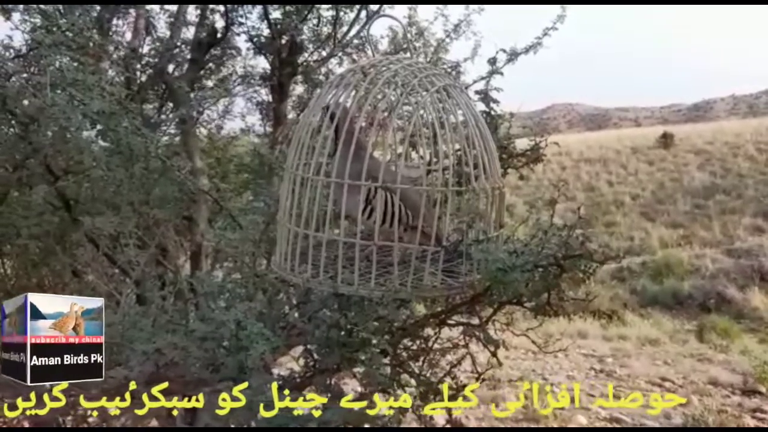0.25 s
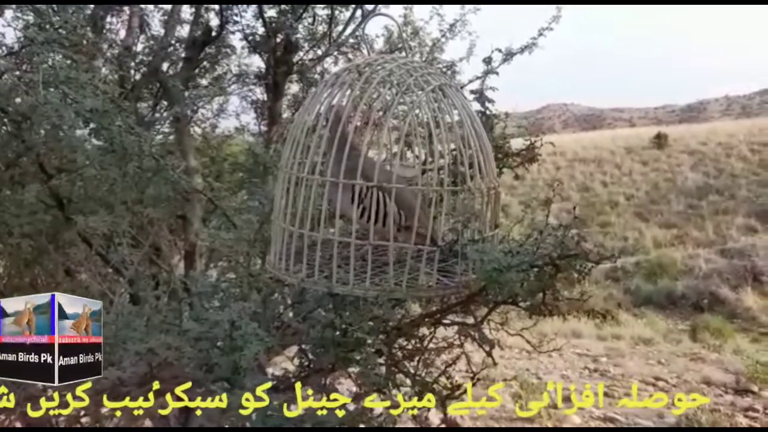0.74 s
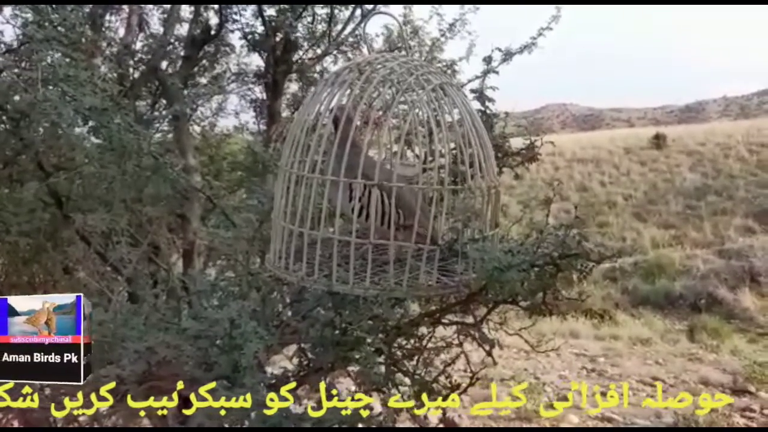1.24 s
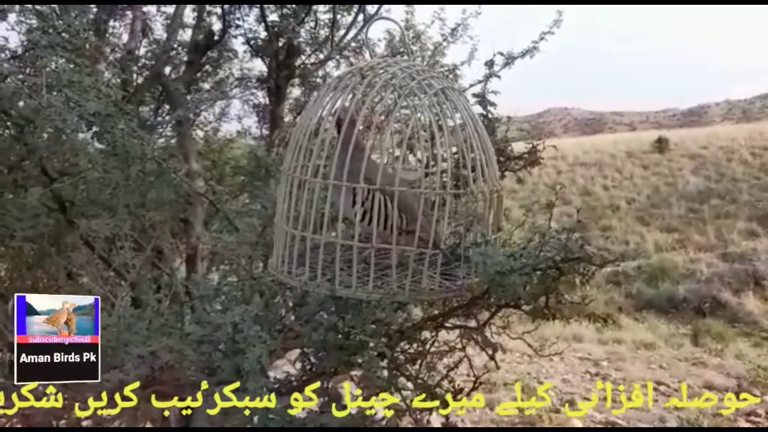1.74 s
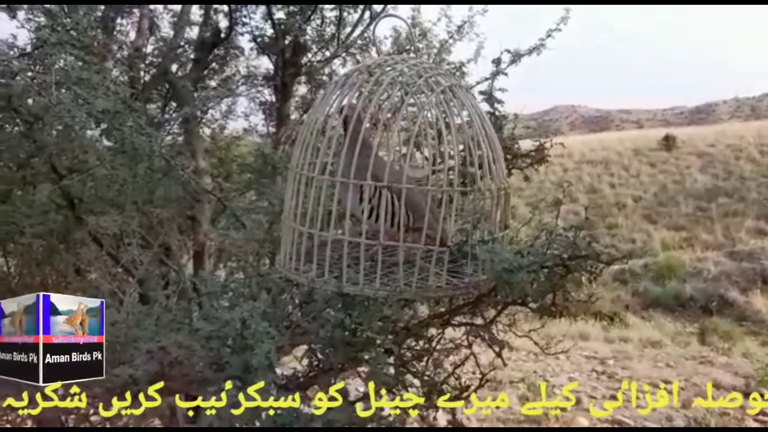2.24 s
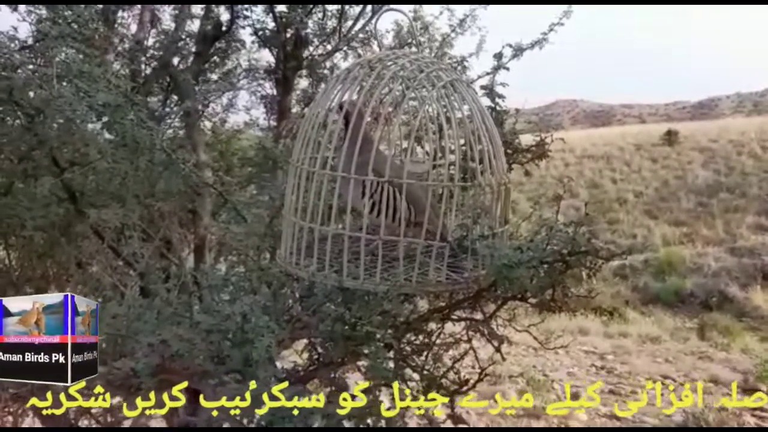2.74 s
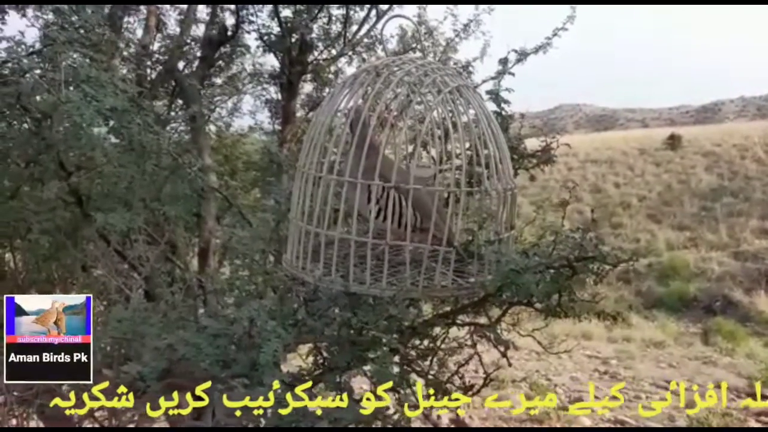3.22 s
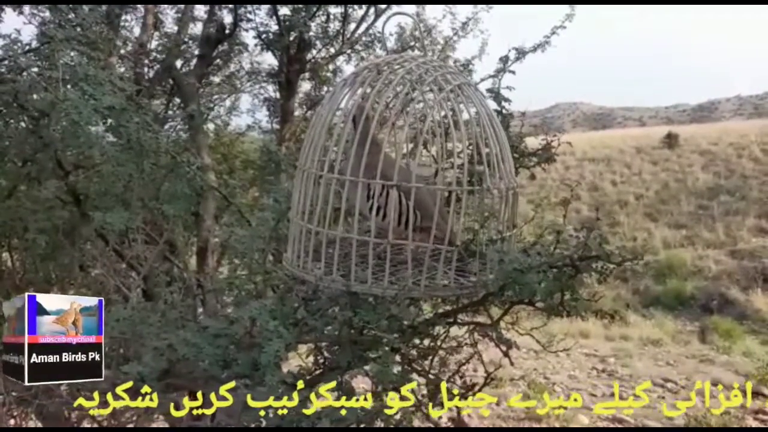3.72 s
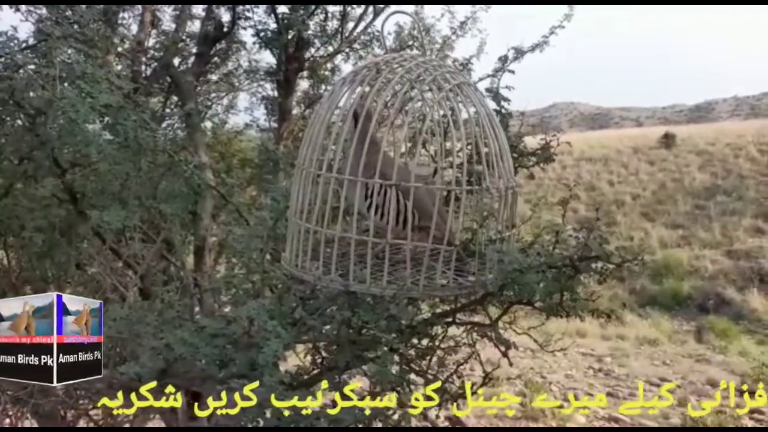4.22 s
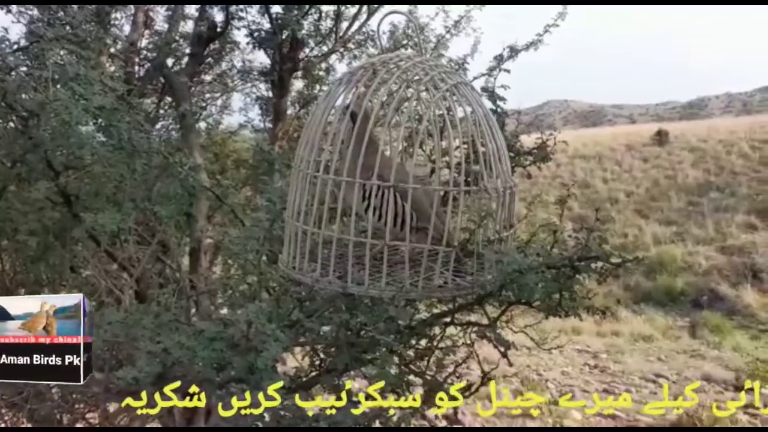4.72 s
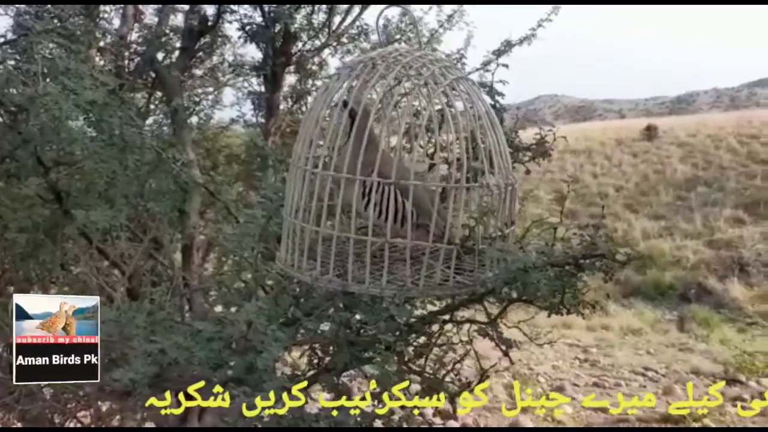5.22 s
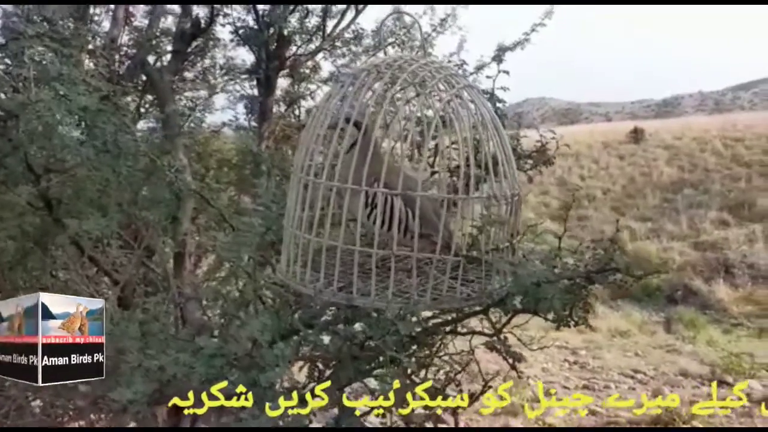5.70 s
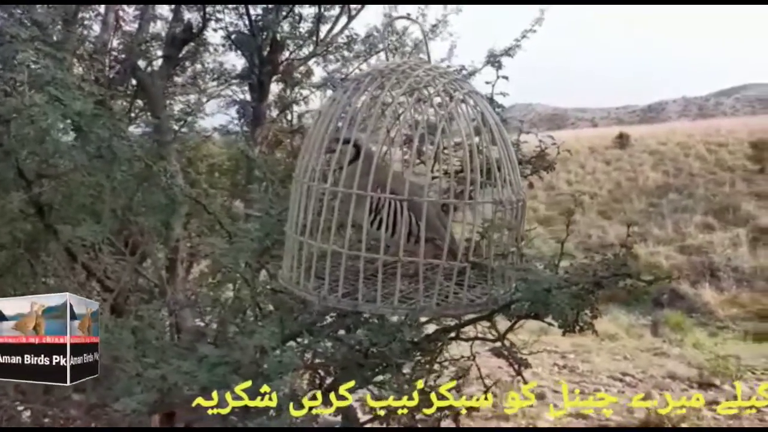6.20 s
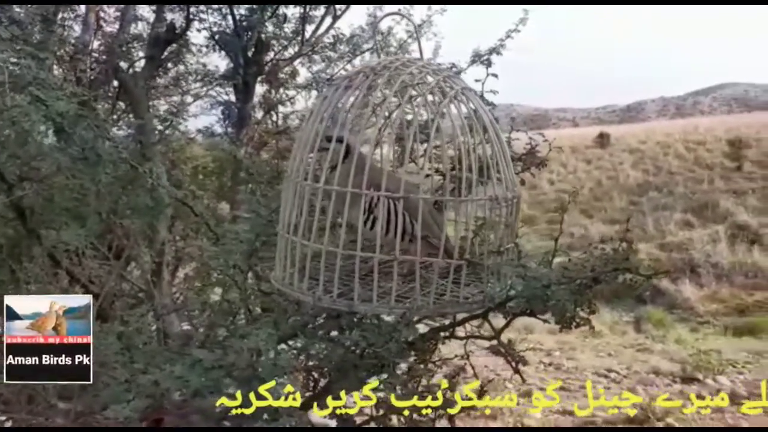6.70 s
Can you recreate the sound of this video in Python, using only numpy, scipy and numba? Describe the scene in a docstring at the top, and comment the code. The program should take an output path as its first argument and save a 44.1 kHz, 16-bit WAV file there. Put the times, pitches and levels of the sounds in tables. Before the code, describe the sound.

On a quiet open hillside, a caged partridge calls loudly and close, almost entirely on the right. Short hoarse barks, several per second, settle into a steady 'chuk, ka-kar' phrase that climbs in pitch and brightens. Softer husky clucks, perhaps another bird, sit near the centre and gradually weaken. Faint thin whistles come and go, and a slight echo trails off the slope.

```python
"""In quiet air on an open hillside, soft husky clucks, perhaps of a second bird, and hoarse barks start together.
The barks, far to the right, are a caged chukar partridge: membrane pulses ring in a moving throat resonance.
They settle into the phrase 'chuk, ka-kar' and climb in pitch, each with a dull bump and a faint echo off the slope.
Low buffets swell early on, and thin, distant whistles come and go as gliding sine tones.
The clucks weaken; after one tick of the wicker cage, a noise burst, only muffled ones remain under the calls."""
import sys
import numpy as np
from scipy import signal
from scipy.fft import rfft, irfft, next_fast_len
from scipy.io import wavfile
from scipy.ndimage import uniform_filter1d, minimum_filter1d
from numba import njit

SR = 44100
rng = np.random.default_rng(int(sys.argv[2]) if len(sys.argv) > 2 else 0)


def wrap_up_sound(samples):
    """Save the sound to the file named by the first command line argument, as 16-bit audio."""
    columns = np.atleast_2d(samples).T
    # keep every value between -1 and 1, then stretch to whole-number steps
    tamed = np.clip(columns, -1, 1)
    steps = np.round(tamed * 32767).astype(np.int16)
    wavfile.write(sys.argv[1], SR, steps)


N = 306495

# colour of the low bumps and buffets: frequency_hz, gain_db
LOW_TONE = [(20, -16.5), (55, 3), (110, -2), (170, -11), (260, -13.5), (500, -51.5)]
LEAD_S = .008  # short quiet lead-in before each loud note


def from_db(db):
    """Turn decibels into an amplitude factor."""
    return 10 ** (np.asarray(db) / 20)


def rms_one(x):
    """Scale a sound to an RMS level of 1."""
    return x / np.sqrt(np.mean(x ** 2) + 1e-20)


def add(track, start_s, sound):
    """Mix a sound into a track, cut at the track's end."""
    at = max(int(start_s * SR), 0)
    track[..., at:at + sound.shape[-1]] += sound[..., :max(N - at, 0)]


def coloured(x, points):
    """Filter by a curve of (Hz, dB) points joined along log frequency."""
    size = next_fast_len(x.shape[-1] + 512)
    hz, db = np.transpose(points)
    bin_hz = np.arange(size // 2 + 1) * SR / size
    gain = from_db(np.interp(np.log(bin_hz + 1), np.log(hz), db))
    return irfft(rfft(x, size) * gain, size)[..., :x.shape[-1]]


def filtered(x, order, hz, kind="low"):
    """Apply a Butterworth filter."""
    return signal.sosfilt(signal.butter(order, hz, kind, fs=SR, output="sos"), x)


def flutter(size, rate_hz):
    """Random wavering up to a given rate; spread 1."""
    settle = 2000  # samples dropped while the filter settles
    return rms_one(filtered(rng.standard_normal(size + settle), 2, rate_hz)[settle:])


def evened(x, span_s):
    """Hold the short-term level near 1, as a saturating oscillator does."""
    span = int(span_s * SR)
    power = uniform_filter1d(uniform_filter1d(x ** 2, span), span)
    return x / np.sqrt(np.maximum(power, 0) + 1e-9)


def air():
    """Quiet outdoor air: coloured noise, wavering in level, that settles as time goes on, most on the left."""
    # frequency_hz, gain_db
    air_tone = [(25, -15.5), (80, -1), (130, -6), (220, -9.5), (400, -8.5), (850, -7), (1400, -12),
                (2800, -19), (4500, -10.5), (7500, -36.5), (14000, -27.5)]
    # level of the air: time_s, left_db, right_db
    air_level = [(0, -73, -70.5), (2, -76, -72), (5, -88, -72), (6.95, -86.5, -74)]
    both = rng.standard_normal(N) + .8 * rng.standard_normal((2, N))
    times, *sides = np.transpose(air_level)
    level_db = np.array([np.interp(np.arange(N) / SR, times, side) for side in sides])
    return from_db(level_db + 1.2 * flutter(N, 12)) * rms_one(coloured(both, air_tone))


def syrinx(pitch_hz, jitter, rough, noise, jitter_hz, count=14):
    """Membrane pulses, pulled early and late by a slower second oscillation, with air noise in each opening."""
    size = len(pitch_hz)
    wander = jitter * flutter(size, jitter_hz) + .03 * flutter(size, 45)
    second_hz = pitch_hz * (.43 + .14 * flutter(size, 80))
    second = 2 * np.pi * np.cumsum(second_hz) / SR
    pull = .25 * rough * np.sin(second) * (1 + .6 * flutter(size, 50))
    phase = 2 * np.pi * np.cumsum(pitch_hz * (1 + wander)) / SR + pull + rng.uniform(0, 2 * np.pi)
    pulses = rms_one(sum(np.cos(k * phase) for k in range(1, count + 1)))
    strength = 1 + rough * (.3 * flutter(size, 200) + .3 * np.cos(second))
    breath = noise * rng.standard_normal(size) * (1 + np.cos(phase))
    return pulses * strength + breath


def cluck(start, end, level_db, fall_hz):
    """A weak note: clean low harmonics, husky above, rougher when louder; the pitch drops as it stops."""
    # colours of the voice and of the hiss: frequency_hz, gain_db
    cluck_tone = [(200, -35), (380, -14), (560, -10), (800, -8.5), (1130, -3.5), (1280, -0.5), (1700, 5),
                  (2200, -9), (2850, -16), (3350, -26), (4200, -25), (6000, -45.5)]
    cluck_hiss = [(3300, -23), (4100, -7.5), (4700, -6.5), (5300, 4), (5850, -9), (6400, -29),
                  (7200, -46.5), (8100, -35.5), (10000, -43), (13800, -29.5), (15500, -33)]
    usual_pitch_hz, hz_per_db, usual_db = 539, 3, -30  # a louder cluck is higher
    hiss_db, left_db = -15, -0.5  # hiss relative to the voice; left side of the voice relative to the right
    rise_s = .013
    sink_db_per_hz = 0.1168  # a cluck that falls in pitch also loses strength
    length = end - start
    t = np.arange(int((length + 0.0076) * SR)) / SR

    centre_hz = usual_pitch_hz + hz_per_db * (level_db - usual_db)
    glide_hz = centre_hz + fall_hz * np.interp(t, [0, length], [.5, -.5])
    pitch = glide_hz * np.interp(t - length, [-.02, .012], [1, .6])
    chaos = np.interp(level_db, [-38, -29], [.2, 1])
    source = syrinx(pitch, jitter=.06 * chaos, rough=.6 * chaos, noise=.12, jitter_hz=260)
    husk = filtered(rng.standard_normal(len(t)), 2, 1500, "high")
    voice = from_db(level_db) * evened(coloured(source + 1.7 * husk, cluck_tone), span_s=0.026)

    jet = rng.standard_normal((2, len(t))) * from_db(1.5 * flutter(len(t), 400))
    hiss_swell = from_db(np.interp(t / length, [0, .5, 1.2], [-4, 2, -4]))
    hiss = from_db(level_db + hiss_db) * rms_one(coloured(jet, cluck_hiss)) * hiss_swell

    release = from_db(np.interp(t - length, [-.02, 0, .012], [1, -9, -32]))
    shape = np.clip(t / rise_s, 0, 1) * release
    sink = from_db(sink_db_per_hz * fall_hz * (.5 - t / length))
    return (voice * np.array([[from_db(left_db)], [1]]) + hiss) * shape * sink


@njit
def resonate(x, hz, width_hz):
    """One resonance whose centre moves: a two-pole ring fed by the difference of nearby samples."""
    y, r = np.zeros(len(x)), np.exp(-np.pi * width_hz / SR)
    for i in range(2, len(x)):
        drive = (1 - r * r) / 2 * (x[i] - x[i - 2])
        y[i] = drive + 2 * r * np.cos(2 * np.pi * hz[i] / SR) * y[i - 1] - r * r * y[i - 2]
    return y


def chuk(start, end, syllable, level_db, throat_hz):
    """A note starts as a whistle locked to the throat, breaks into a rough bark, and falls as the beak closes."""
    # the hoarse opening note and the syllables of "chuk, ka-kar", by name:
    #   pitch_share (early pitch / throat resonance), pitch_late_hz, throat_mid and throat_late (share of
    #   the early resonance), mid_db and late_db (relative), rise_s, clear_s (clear onset), rough (1 = full bark)
    syllables = {"hoarse": dict(pitch_share=.36, pitch_late_hz=494.4, throat_mid=1, throat_late=.93, mid_db=-0.5, late_db=-1, rise_s=0.014, clear_s=0.013, rough=.8),
                 "chuk": dict(pitch_share=.335, pitch_late_hz=483.4, throat_mid=.915, throat_late=0.78, mid_db=-3, late_db=-4.5, rise_s=0.0057, clear_s=0.013, rough=1),
                 "ka": dict(pitch_share=.42, pitch_late_hz=483, throat_mid=0.97, throat_late=0.88, mid_db=-1.5, late_db=0.5, rise_s=0.011, clear_s=0.0036, rough=.55),
                 "kar": dict(pitch_share=.338, pitch_late_hz=520.5, throat_mid=0.99, throat_late=0.86, mid_db=1, late_db=-1, rise_s=0.0075, clear_s=0.0071, rough=1)}
    # slow change of the treble over the series: time_s, upper_resonance_db, rasp_db (both relative)
    note_colour = [(0, -33, -22.5), (0.702, -28.5, -21), (.93, -15, -34.5), (2, -12, -39.5),
                   (2.9, -14.5, -36.5), (4.7, -18.5, -38.5), (5.3, -23.5, -28), (6.95, -24.5, -21.5)]
    # colours of the bark, the upper resonance, the rasp and the left side: frequency_hz, gain_db
    beak_tone = [(150, -37), (230, -15), (300, 7), (400, -5.5), (600, -8.5), (780, -12), (900, -18.5),
                 (1020, -23.5), (1250, -3), (1800, -2), (2400, -4.5), (2850, -6.5), (3300, -30),
                 (4000, -31.5), (6000, -58)]
    upper_tone = [(3000, -27.5), (3500, -4.5), (3900, -5), (4250, -2), (4520, 4), (4850, -11),
                  (5400, -16.5), (6200, -13), (6700, -8), (7350, -16), (7900, -41.5), (14000, -32)]
    rasp_tone = [(3500, -27), (4600, -3.5), (5150, 9.5), (5650, 0.5), (6100, -15.5), (7000, -43.5),
                 (7800, -42.5), (14000, -44)]
    left_tone = [(200, -5.5), (550, -1), (1100, 9.5), (1400, 1), (1900, -10.5), (2600, 7), (4500, 6.5),
                 (5200, 10), (9000, 10.5)]
    left_db = -43.5  # the loud notes hardly reach the left side
    brighten_db_per_oct, usual_throat_hz = 8.5, 1915  # a higher note is also brighter above its resonance
    core_share = 0.049  # a little of the opening whistle lasts through the bark
    shape = syllables[syllable]
    times, *columns = np.transpose(note_colour)
    upper_db, rasp_db = [np.interp(start, times, column) for column in columns]
    length = end - start
    t = np.arange(int((LEAD_S + length + 0.027) * SR)) / SR - LEAD_S
    u = t / length  # place within the note

    pitch_early, pitch_late = throat_hz * shape["pitch_share"], shape["pitch_late_hz"]
    pitch = np.interp(u, [0, .3, .82, 1.25], [pitch_early * 1.03, pitch_early, pitch_late, pitch_late * .6])
    hz_mid, hz_late = throat_hz * shape["throat_mid"], throat_hz * shape["throat_late"]
    throat_path = [throat_hz * .95, throat_hz, hz_mid, hz_late * 0.91, hz_late * 0.88]
    throat = np.interp(u, [0, .17, .5, .86, 1.1], throat_path)
    throat = throat * (1 + .04 * np.clip(u / .3, 0, 1) * flutter(len(t), 70))

    # the membranes are most chaotic under full pressure and settle as it falls
    chaos = shape["rough"] * np.interp(u, [.55, .9], [1, .55])
    source = syrinx(pitch, jitter=.055 * chaos, rough=.9 * chaos, noise=.14 * chaos, jitter_hz=300)
    bright_db = brighten_db_per_oct * np.log2(throat_hz / usual_throat_hz)
    tilted = coloured(source, [(1000, -1.6), (1600, -2.8), (2500, bright_db - 0.5)])
    bark = evened(coloured(resonate(tilted, throat, 230.0), beak_tone), span_s=0.0057)
    bark = bark * from_db(2.1 * flutter(len(t), 90))

    clear = np.clip((shape["clear_s"] - t) / 0.0063 + .5, np.clip(core_share, 0, .5), 1) * 0.72
    turn = 2 * np.pi * np.cumsum(throat) / SR
    harmonics = np.sin(turn) + from_db(-29.0) * np.sin(2 * turn) + from_db(-40) * np.sin(3 * turn)
    whistle = np.sqrt(2) * harmonics
    whistle_share = np.sqrt(np.clip(1 - (1 - clear) ** 2, 0, 1))
    voice = whistle_share * whistle + (1 - clear) * bark

    # the upper resonance follows the throat; it and the rasp speak most while the note is pushed hard
    push = from_db(np.interp(u, [0, .3, .65, 1], [1.5, 0.0, -3, -9.0])) * (1 - .5 * clear)
    upper_hz = 4520 * (throat / hz_mid) ** 0.38 * (throat_hz / usual_throat_hz) ** 0.25
    upper_ring = coloured(resonate(source, upper_hz, 390.0), upper_tone)
    upper = from_db(upper_db) * evened(upper_ring, span_s=0.0084)
    rasp = from_db(rasp_db) * evened(coloured(source, rasp_tone), span_s=0.013)

    course_db = [0, shape["mid_db"], shape["late_db"], shape["late_db"] - 13]
    body_db = level_db + np.interp(u, [.17, .5, .8, 1], course_db)
    release_db = np.interp(t - length, [0, .006, .018, .04], [-0.5, -16.5, -30.5, -45.5])
    # a very quiet lead-in, then a quick rise to full level
    attack = np.interp(t, [-LEAD_S, 0, .4 * shape["rise_s"], shape["rise_s"]], [0, .009, .6, 1])
    note = (voice + push * (upper + rasp)) * from_db(body_db + release_db) * attack
    return np.array([from_db(left_db) * coloured(note, left_tone), note])


def thump(call):
    """A dull, low bump: low noise that follows the strength of each loud note."""
    # level of the bump relative to the call: time_s, level_db
    thump_level = [(0, -57.5), (1.9, -56), (2.55, -36), (5.5, -33.5), (6.95, -39.5)]
    strength = np.sqrt(np.maximum(filtered(call ** 2, 2, 25), 0))
    level = from_db(np.interp(np.arange(N) / SR, *np.transpose(thump_level)))
    low = evened(coloured(rng.standard_normal(N), LOW_TONE), span_s=0.049)
    return level * strength * low * from_db([[-40], [0]])


def hillside(call):
    """Bushes and the slope scatter a faint, long echo: the call convolved with decaying noise."""
    # frequency_hz, gain_db
    slope_tone = [(150, -20.5), (320, 5.5), (900, 6), (1500, -5.5), (2000, -5), (2700, 10.5), (4500, 0.5),
                  (8000, -10.5)]
    t60_s = 1.5
    t = np.arange(int(1.2 * SR)) / SR
    scatter = rng.standard_normal((2, len(t))) * from_db(-60 * t / t60_s) * np.clip(t / .01, 0, 1)
    echo = signal.fftconvolve(call[None], scatter / np.sqrt(np.sum(scatter[0] ** 2)), axes=1)[:, :N]
    return coloured(echo, slope_tone) * from_db([[-76], [-53]])


def buffet(start, length, level_db):
    """A brief low buffet on the microphone, mostly on the left: a swell of low noise."""
    swell = np.hanning(int(length * SR))
    low = filtered(coloured(rng.standard_normal((2, len(swell))), LOW_TONE), 4, 115)
    return from_db(level_db) * swell * rms_one(low) * from_db([[0], [-10]])


def far_whistle(start, hz, level_db):
    """A thin sine tone, slightly arched in pitch."""
    whistle_s = 0.09
    arch = np.sin(np.linspace(0, np.pi, int(whistle_s * SR)))
    pitch = hz * (.97 + .035 * arch + .009 * flutter(len(arch), 200))
    tone = np.sin(2 * np.pi * np.cumsum(pitch) / SR)
    return from_db(level_db) * arch * tone * from_db([[-5], [0]])


def tick(start_db):
    """A small dry tick of the wicker: band-limited noise that dies within hundredths of a second."""
    t = np.arange(SR // 20) / SR
    crack = rms_one(filtered(rng.standard_normal(len(t)), 1, [300, 3000], "band"))
    return crack * from_db(start_db - 60 * t / 0.022) * from_db([[-15], [0]])


def muffled_cluck(start, end):
    """The same cluck, very weak and with only its lowest harmonics."""
    cut_db, cutoff_hz = -26.5, 950
    weak = cluck(start, end, level_db=-36.5, fall_hz=100)
    return from_db(cut_db) * filtered(weak, 3, cutoff_hz)


def play_rows(table, sing, early_s=0):
    """Play every row of a table at its start time, or a little ahead of it."""
    out = np.zeros((2, N))
    for row in table:
        add(out, row[0] - early_s, sing(*row))
    return out


def scene():
    """Sum the calls with their bumps and echo, and the quiet sounds around them."""
    # soft clucks, between and under the loud notes: start_s, end_s, level_db, pitch_fall_hz
    soft_clucks = [(0, .04, -22, 91.5), (.064, .135, -21, 62.5), (.301, .39, -26, 90),
                   (.545, .605, -24, 138), (.638, .7, -25, 13.5), (.865, .965, -29.5, -0.5),
                   (1.095, 1.147, -28.5, 200.5), (1.185, 1.265, -30, 3.5), (1.425, 1.508, -28, 200.5),
                   (1.681, 1.76, -33.5, 184), (1.785, 1.84, -28, 195.5), (2.012, 2.095, -30.5, 62),
                   (2.255, 2.323, -33.5, 179.5), (2.366, 2.43, -31.5, -19), (2.605, 2.727, -36.5, -1.5),
                   (2.93, 2.998, -36, 148.5), (3.04, 3.112, -38.5, 81.5), (3.28, 3.375, -38, 171.5),
                   (3.375, 3.416, -33, 146), (3.62, 3.697, -39, -22), (3.73, 3.81, -39, 130),
                   (3.98, 4.042, -37, 129.5), (4.09, 4.15, -38, 82), (4.33, 4.397, -37.5, 128),
                   (4.438, 4.497, -37.5, 100.5), (4.69, 4.752, -38, 70.5), (4.803, 4.88, -39.5, 62)]
    # loud notes: start_s, end_s, syllable, level_db, throat_resonance_hz
    loud_notes = [(.014, .066, "hoarse", -12, 1525), (.116, .163, "hoarse", -13.5, 1553),
                  (.309, .371, "hoarse", -11, 1640), (.496, .56, "hoarse", -8.5, 1663),
                  (.553, .607, "hoarse", -11.5, 1604), (.749, .809, "hoarse", -11, 1748),
                  (.93, .985, "kar", -11, 1633), (1.038, 1.111, "hoarse", -11.5, 1630),
                  (1.241, 1.3, "kar", -11, 1696), (1.416, 1.47, "hoarse", -14, 1694),
                  (1.526, 1.603, "kar", -11, 1683), (1.733, 1.792, "chuk", -8, 1799),
                  (1.914, 1.965, "kar", -12.5, 1795), (2.022, 2.098, "kar", -8.5, 1732),
                  (2.235, 2.301, "chuk", -7.5, 1848), (2.419, 2.475, "ka", -8.5, 1762),
                  (2.528, 2.603, "kar", -7.5, 1814), (2.736, 2.801, "chuk", -6.5, 1906),
                  (2.919, 2.975, "ka", -7.5, 1774), (3.027, 3.101, "kar", -8, 1866),
                  (3.247, 3.31, "chuk", -7, 1923), (3.434, 3.489, "ka", -8.5, 1826),
                  (3.541, 3.618, "kar", -6.5, 1817), (3.767, 3.829, "chuk", -5, 1935),
                  (3.964, 4.019, "ka", -10, 1814), (4.073, 4.151, "kar", -7.5, 1809),
                  (4.305, 4.369, "chuk", -6, 1907), (4.498, 4.556, "ka", -9, 1755),
                  (4.605, 4.688, "kar", -7.5, 1862), (4.834, 4.899, "chuk", -5.5, 1959),
                  (5.03, 5.087, "ka", -8, 1875), (5.144, 5.221, "kar", -5, 1980),
                  (5.37, 5.442, "chuk", -6, 2071), (5.581, 5.636, "ka", -9.5, 1888),
                  (5.688, 5.772, "kar", -7, 1989), (5.923, 5.998, "chuk", -7, 2029),
                  (6.133, 6.189, "ka", -12, 1882), (6.244, 6.321, "kar", -9, 2005),
                  (6.472, 6.533, "kar", -10.5, 2038), (6.53, 6.574, "chuk", -6, 2027),
                  (6.737, 6.786, "ka", -12, 1924), (6.855, 6.936, "kar", -10, 2097)]
    # low buffets: start_s, length_s, level_db
    low_buffets = [(.035, .13, -44), (.76, 0.091, -57), (1, 0.12, -60)]
    # thin whistles: start_s, nominal_pitch_hz, level_db
    thin_whistles = [(.125, 4680, -61), (.225, 5020, -74), (.385, 4650, -63.5), (.595, 5000, -66),
                     (1.595, 4750, -71), (1.955, 4980, -61.5), (2.315, 4870, -58.5), (2.795, 5000, -70),
                     (4.235, 4860, -76), (5.77, 4880, -66), (6.335, 4920, -68), (6.67, 4840, -70)]
    # the later, faint clucks: start_s, end_s
    late_clucks = [(5.28, 5.33), (5.515, 5.57), (5.805, 5.845), (6.015, 6.05), (6.24, 6.3), (6.45, 6.49),
                   (6.58, 6.63), (6.675, 6.735), (6.87, 6.92)]
    loud = play_rows(loud_notes, chuk, early_s=LEAD_S)
    calls = loud + play_rows(soft_clucks, cluck) + play_rows(late_clucks, muffled_cluck)
    calls[0] = np.roll(calls[0], -4)  # the call reaches the left side 4 samples earlier
    out = calls + thump(loud[1]) + hillside(calls[1]) + air()
    out += play_rows(low_buffets, buffet) + play_rows(thin_whistles, far_whistle)
    add(out, 5.005, tick(start_db=-49.5))
    return out


def record(dry):
    """A fast limiter holds the peaks at full scale; a steep low-pass cuts the top."""
    cutoff_hz = 16200
    size = int(.0015 * SR)
    allowed = 1 / np.maximum(np.abs(dry), 1)
    gain = uniform_filter1d(minimum_filter1d(allowed, 2 * size), size)
    return signal.sosfilt(signal.cheby2(14, 60, cutoff_hz, fs=SR, output="sos"), dry * gain)


dry = scene()
out = record(dry)
wrap_up_sound(out)
```